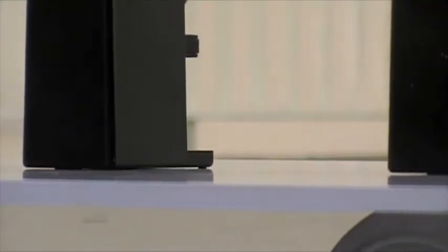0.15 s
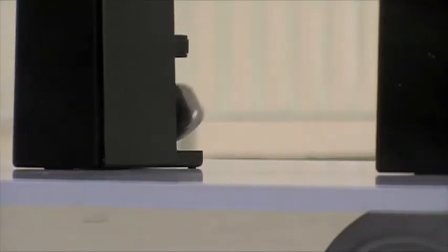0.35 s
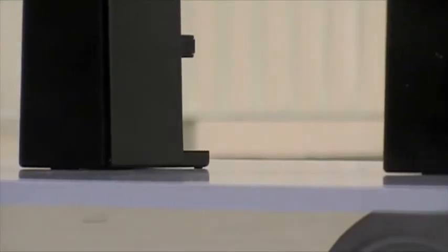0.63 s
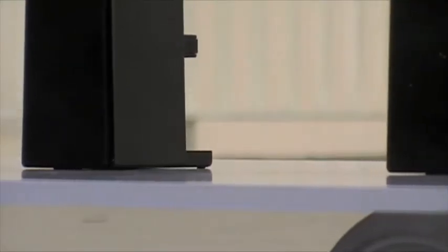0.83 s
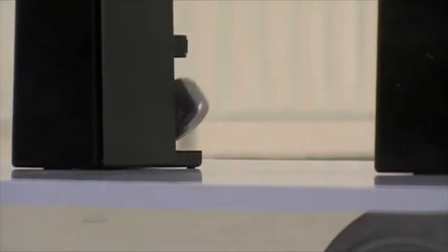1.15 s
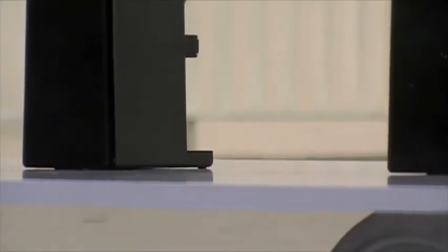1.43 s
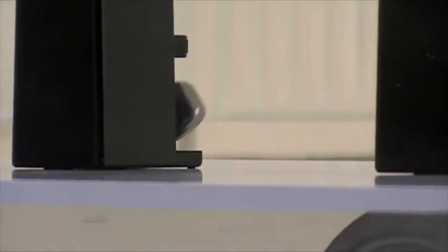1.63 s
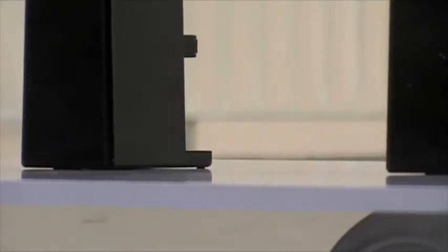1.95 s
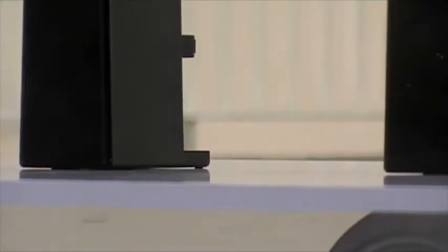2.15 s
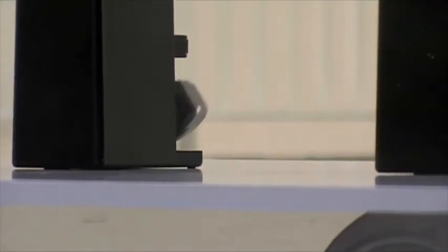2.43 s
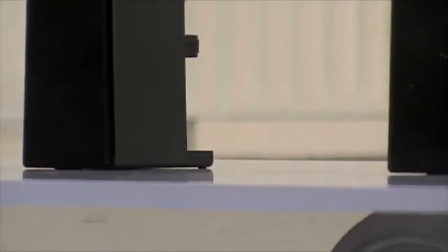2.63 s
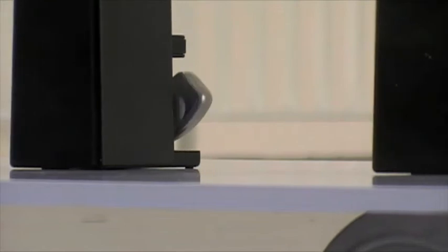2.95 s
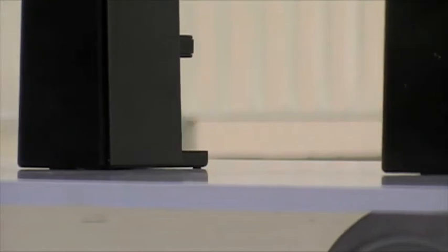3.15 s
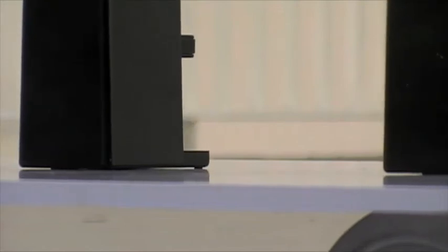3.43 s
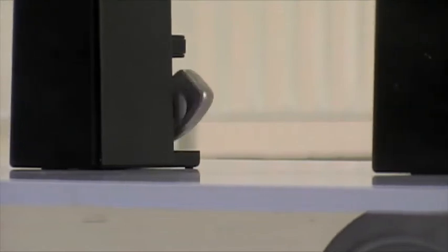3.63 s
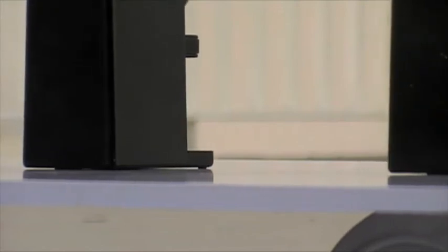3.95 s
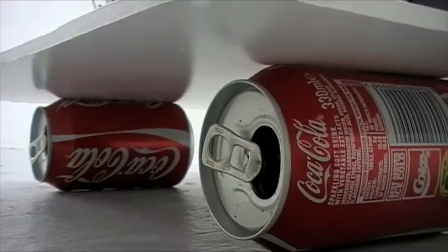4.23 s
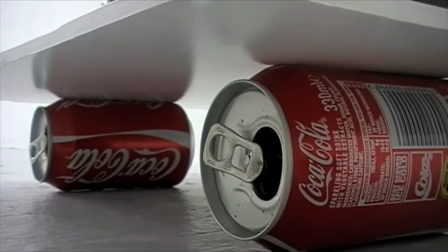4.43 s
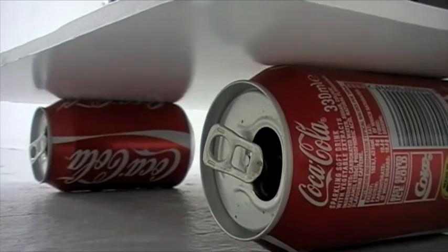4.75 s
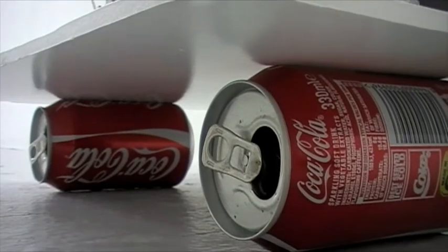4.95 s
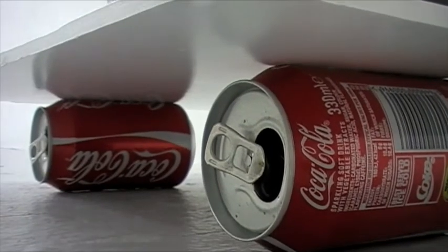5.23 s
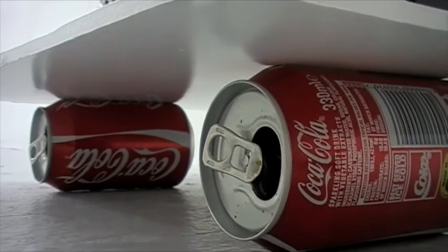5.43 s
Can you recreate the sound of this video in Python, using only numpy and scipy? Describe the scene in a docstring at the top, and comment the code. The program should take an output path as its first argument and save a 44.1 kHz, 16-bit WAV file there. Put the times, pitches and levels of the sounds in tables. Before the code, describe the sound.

From 0 to about 4 seconds, three small wind-up metronomes tick almost in unison, heard from close beside them in a live room. A strike group falls roughly every 0.32 seconds, each a tight flam of sharp, dry snaps with plastic clatter, short case ringing and a bright reverberant tail. Quiet room air and a low building hum lie beneath. Dull knocks and shuffles sound further off around 0.2 and 0.6 seconds, more faintly near 1.7 and 2.1, then again at 3.3 to 3.6. Faint high rustles appear around 1.9 and 2.5 to 2.7. Just before 4.04 seconds everything fades quickly to silence and returns at once from under the board. The same steady beat is now louder and more hollow, its clicks smeared into resonant bursts with very faint low thuds and weaker hum. A small soft knock comes near 5.3, and ticking continues to the end, around 5.6.

```python
"""Three wind-up metronomes tick almost in step on a light board resting on two empty cans, in a live room.
Each strike is a snap with clatter and ringing case modes, and every strike sets off a noise reverberation.
The microphone stands beside them at first; after a short fade it lies under the board, where the ticks are
louder and more hollow: smeared bursts and ringing board modes, with faint low thuds.
Soft knocks are bursts of low noise further off; shaped noise makes the rustles, the air and the rumble."""
import sys
import numpy as np
from scipy import signal
from scipy.fft import rfft, irfft, next_fast_len
from scipy.io import wavfile
from scipy.ndimage import uniform_filter1d, minimum_filter1d

SR = 44100
rng = np.random.default_rng(int(sys.argv[2]) if len(sys.argv) > 2 else 0)


def dump_mix(stems):
    """Bounce the given channels to the path in sys.argv[1] as a 16-bit WAV at rate SR."""
    frames = np.atleast_2d(stems).T  # one column per channel
    limited = np.clip(frames, -1, 1)  # hard clip at full scale
    pcm = np.round(limited * 32767).astype(np.int16)
    wavfile.write(sys.argv[1], SR, pcm)


N = 246519

TIME = np.arange(N) / SR
MOVE_S = 4.041    # the microphone changes place
SWING_S = 0.635   # one period of the pendulums: a tick and a tock

# Colour of each metronome heard from beside the board: [f/Hz, relative level/dB]
FIRST_COLOUR = [(100, -32), (400, -33), (820, 2), (1100, -7.5), (1500, -8), (2100, 1.5), (2800, -7.5),
                (3600, 7.5), (4500, -6), (6500, -6.5), (9000, -17.5), (12000, -30), (15500, -41)]
SECOND_COLOUR = [(100, -53), (400, -17), (820, -14.5), (1100, 4.5), (1500, -8.5), (2100, 3), (2800, -1.5),
                 (3600, -2.5), (4500, -5), (6500, -6), (9000, -19), (12000, -23.5), (15500, -49)]
THIRD_COLOUR = [(100, -21), (400, -14), (820, -23), (1100, 1), (1500, -8), (2100, 3), (2800, -5), (3600, 0),
                (4500, -5), (6500, -6.5), (9000, -25), (12000, -30), (15500, -65)]
# Colour from under the board, of the leading pair and of the third: [f/Hz, relative level/dB]
PAIR_UNDER = [(100, -34), (400, -23), (820, -24.5), (1130, -6.5), (1400, -18), (1720, -10), (2020, -2.5),
              (2300, -7.5), (3600, -9), (5000, -11), (7500, -14), (9500, -28), (12000, -35.5), (15500, -56)]
THIRD_UNDER = [(100, -44), (400, -13.5), (820, -21), (1100, -5.5), (1350, -15), (1850, -0.5), (2500, -2),
               (3100, -10), (4800, -2), (6000, -9.5), (8300, -17.5), (11000, -34), (15500, -54)]
# Board modes rung by the leading pair, right above the microphone:
# [f/Hz, typical level relative to the strike/dB, t60/s]
BOARD_MODES = [(380, -22, 0.22), (2003, 8, 0.022)]


def metronomes(first, second, third):
    """Three cases, each with its own colour, clatter and rebound; only the leading pair rings the board."""
    return (metronome(first, FIRST_COLOUR, PAIR_UNDER, BOARD_MODES,
                      clatter_db=-21, clatter_t60=0.06, rebound_s=0.0024)
            + metronome(second, SECOND_COLOUR, PAIR_UNDER, BOARD_MODES,
                        clatter_db=-16, clatter_t60=0.04, rebound_s=0.00117)
            + metronome(third, THIRD_COLOUR, THIRD_UNDER, [],
                        clatter_db=-19, clatter_t60=0.06, rebound_s=0.0027))


# Modes of the plastic cases: [f/Hz, typical level relative to the strike/dB, t60/s]
CASE_MODES = [(379.2, -22, 0.23), (1190, -22, .035), (2175, -5, 0.037), (2370, -28, 0.14),
              (3540, -49, 0.042), (3797, -5.5, 0.021), (4728, -6.5, 0.03), (6640, -9.5, 0.042),
              (7310, -30, 0.041)]


def metronome(strikes, beside, under, board_modes, clatter_db, clatter_t60, rebound_s, change=0.49):
    """Tick and tock each have their own grain, partly renewed at each strike, plus decaying sine modes."""
    t = np.arange(SR // 4) / SR
    grains = rng.standard_normal((2, 2, len(t)))   # (tick or tock, mid or side, time)
    out = np.zeros((2, N))
    for k, (s, level_db) in enumerate(strikes):
        fresh = rng.standard_normal((2, len(t)))
        grain = (grains[k % 2] + change * fresh) / np.hypot(1, change)
        if s < MOVE_S:   # the direct sound is narrower than the room
            mid, side = [tick_shape(t, beside, g, clatter_db, clatter_t60, rebound_s) for g in grain]
            side_db, modes = -7.5, CASE_MODES
        else:   # the board covers the cases and rings itself
            mid, side = [board_shape(t, under, g) for g in grain]
            side_db, modes = -4, board_modes
        for hz, mode_db, t60 in modes:
            strength = from_db(mode_db + 1.55 * rng.standard_normal())
            swell_and_decay = dying(t, t60) - dying(t, 0.003)   # swells in a fraction of a millisecond
            mid = mid + strength * np.sin(2 * np.pi * hz * t) * swell_and_decay
        side = from_db(side_db) * np.roll(side, SR // 1500)   # later, by way of nearby surfaces
        add(out, s, from_db(level_db) * np.array([mid, side]))
    low_cut_hz = 150   # the ticks carry no bass
    return signal.sosfilt(signal.butter(2, low_cut_hz, "high", fs=SR, output="sos"), out)


def tick_shape(t, spectrum, grain, clatter_db, clatter_t60, rebound_s,
               snap_db=-14, snap_t60=0.0052, rebound_db=-11):
    """A sharp snap, a small rebound of the pallet and dense clatter of the case; rms 1 over the first 4 ms."""
    snap = from_db(snap_db) * dying(t, snap_t60)
    clatter = from_db(clatter_db) * dying(t, clatter_t60)
    blow = grain * (snap + clatter)
    blow[0] = 1
    blow[round(rebound_s * SR)] += from_db(rebound_db)
    return first_4ms_one(colour(blow, spectrum))


def board_shape(t, spectrum, grain, swell_s=0.00067, burst_t60=0.016, clatter_db=-14, clatter_t60=0.056):
    """The board smears the snap into a burst that swells and dies; rms 1 over the first 4 ms."""
    flutter = np.tanh(2 * grain)   # many small, evenly strong reflections inside the board
    swell = 1 - np.exp(-t / swell_s)
    decay = dying(t, burst_t60) + from_db(clatter_db) * dying(t, clatter_t60)
    return first_4ms_one(colour(flutter * swell * decay, spectrum))


# Beat of each metronome, one row beside the board and one under it; every second strike (the tock) limps:
# [first tick t/s, beat/s, lateness of the tock/s, growth of that lateness/(s per beat)]
FIRST_BEAT = [(.0372, .31768, -.0007, -.00017), (4.184, .31655, -.0013, -.00025)]
SECOND_BEAT = [(.0427, .31768, .0011, 0), (4.1858, .31687, .004, -.0004)]
THIRD_BEAT = [(.0581, .31761, -.0011, .0007), (4.2071, .31657, .004, 0)]
# Strength of the snap or burst before its modes, one row beside the board and one under it:
# [tick level/dB, tock level/dB]
FIRST_DB = [(-19, -17.5), (-12, -12.4)]
SECOND_DB = [(-16.5, -17.5), (-19.5, -13)]
THIRD_DB = [(-20, -19), (-11.3, -9.5)]


def all_strikes():
    """Strike lists of the three escapements, each on a beat of its own."""
    return [escapement(beat, levels) for beat, levels in
            ((FIRST_BEAT, FIRST_DB), (SECOND_BEAT, SECOND_DB), (THIRD_BEAT, THIRD_DB))]


def escapement(beat, levels):
    """Strikes (t/s, level/dB): tick and tock alternate on an even beat, the tock a little early or late."""
    strikes = []
    ends = (MOVE_S, N / SR)
    for (start_s, beat_s, limp_s, limp_growth), tick_tock_db, end_s in zip(beat, levels, ends):
        for k, s in enumerate(np.arange(start_s, end_s, beat_s)):
            tock = k % 2
            strikes.append((s + tock * (limp_s + limp_growth * k), tick_tock_db[tock]))
    return strikes


def low_thuds(strikes, level_db=-50, hz=55, t60=0.048):
    """Under the board, a faint low decaying sine goes with each strike, at varying level."""
    t = np.arange(SR // 10) / SR
    out = np.zeros(N)
    for s, _ in strikes:
        if s > MOVE_S:
            strength = from_db(level_db + 3.5 * rng.standard_normal())
            add(out, s, strength * np.sin(2 * np.pi * hz * t) * dying(t, t60))
    return out


# Colour of the reverberation beside and under the board: [f/Hz, relative level/dB]
ROOM_BESIDE = [(100, -41.5), (250, -5), (400, -4.5), (850, -2), (1150, -0.5), (1550, -3), (2300, 4.5),
               (3000, -4), (3600, -3.5), (5400, -5.5), (7500, -9), (10000, -17.5), (13000, -39),
               (15500, -52)]
ROOM_UNDER = [(100, -36), (250, -24), (400, -18), (850, -16), (1150, -10), (1550, -7), (2300, 3.5),
              (3000, -8.5), (3600, -7.5), (5400, -10.5), (7500, -21.5), (10000, -27.5), (13000, -41),
              (15500, -75)]


def tick_tails(strikes, responses, beside_db=9.0, under_db=13.0, scatter=0.59, scatter_t60=0.046):
    """Every strike fills the room alike: a click and scattered noise of energy 1 drive the reverberation."""
    t = np.arange(SR // 40) / SR
    drive = np.zeros(N)
    for s, _ in strikes:
        blow = scatter * rng.standard_normal(len(t)) * dying(t, scatter_t60)
        blow[0] = 1
        add(drive, s, blow / np.sqrt(np.sum(blow ** 2)))
    placed = []
    for response in responses:
        tail = ringing_on(drive, response)
        beside = from_db(beside_db) * colour(tail, ROOM_BESIDE)
        under = from_db(under_db) * colour(tail, ROOM_UNDER)
        placed.append(np.where(TIME < MOVE_S, beside, under))
    return np.array(placed)


def ringing_on(drive, response):
    """Convolve with a long response; the pendulums were already swinging one period earlier."""
    lead = round(SWING_S * SR)
    return signal.fftconvolve(np.concatenate([drive[:lead], drive]), response)[lead:lead + N]


# Decay of the room: [f/Hz, t60/s]
ROOM_T60 = [(150, 0.99), (500, 1.28), (1400, 0.63), (2300, 1.05), (3300, 0.71), (6000, 0.76), (12000, 0.61)]


def room_response(build_s=0.0019):
    """Diffuse reverberation: half-octave bands of noise, each dying at its own rate; energy 1."""
    t = np.arange(3 * SR // 2) / SR
    white = rfft(rng.standard_normal(len(t)))
    freqs = np.arange(len(white)) * SR / len(t)
    band = np.round(2 * np.log2(np.maximum(freqs, 64)))   # half-octave number
    tail = np.zeros(len(t))
    for b in np.unique(band):
        tail += irfft(white * (band == b), len(t)) * dying(t, at_hz(ROOM_T60, 2 ** (b / 2)))
    tail = tail * (1 - np.exp(-t / build_s))
    return tail / np.sqrt(np.sum(tail ** 2))


# Dull knocks and shuffles in the room, before reverberation:
# [t/s, level before decay/dB, t60/s, lower edge f/Hz, upper edge f/Hz]
KNOCKS = [(.157, -25.5, 0.05, 220, 1300), (.166, -18.5, 0.12, 178, 725), (.199, -25, 0.14, 282, 1050),
          (.28, -35, 0.12, 334, 780), (.600, -28, 0.17, 157, 415), (.612, -36, 0.17, 415, 935),
          (1.725, -37.5, 0.46, 135, 720), (2.07, -49, 0.28, 70, 159), (3.335, -33.5, 0.46, 298, 1500),
          (3.375, -41.5, 0.22, 85, 420), (3.60, -34.5, 0.57, 350, 1450), (5.277, -33, 0.06, 149, 1310)]


def knocks(responses, wet_db=-5):
    """Soft blows on furniture: short low noise bursts with much of the room in them."""
    t = np.arange(SR // 2) / SR
    direct = np.zeros(N)
    for s, level_db, t60, low_hz, top_hz in KNOCKS:
        body = signal.butter(2, [low_hz, top_hz], "band", fs=SR, output="sos")
        once = signal.sosfilt(body, rng.standard_normal(len(t)))
        thud = rms_one(signal.sosfilt(body, once))   # filtered twice for steeper edges
        add(direct, s, from_db(level_db) * thud * dying(t, t60))
    mid, side = [from_db(wet_db) * signal.fftconvolve(direct, response)[:N] for response in responses]
    return np.array([direct + mid, side])


# Colour of the rustles: [f/Hz, relative density level/dB]
RUSTLE = [(1000, -26), (3000, 0), (8000, 5), (11000, -6.5), (15000, -26)]
# Faint high rustles: [start t/s, peak level of the noise gain/dB]
RUSTLES = [(1.86, -51.5), (2.52, -40), (2.71, -45)]


def rustling(attack_s=0.014, t60=0.68):
    """High noise that swells quickly and dies away slowly at each rustle."""
    gain, t = np.zeros(N), np.arange(SR) / SR
    for s, level_db in RUSTLES:
        add(gain, s, from_db(level_db) * np.minimum(t / attack_s, dying(t - attack_s, t60)))
    return hiss(RUSTLE, gain)


# Background of the room: [f/Hz, relative density level/dB]
AIR = [(18, -77), (30, -48), (81, -16.5), (176, -11), (240, -10.5), (511, -3), (1090, -2), (1520, -6),
       (2370, 0), (2770, -9.5), (4780, -11.5), (8470, -26.5), (15000, -55)]


def room_air():
    """Steady coloured noise of the room."""
    return hiss(AIR, by_place(beside_db=-41, under_db=-42))


# Low rumble and hum of the building: [f/Hz, relative density level/dB]
RUMBLE = [(25, -31), (50, -15), (76, -5.5), (86, -1.5), (95, 2.5), (112, -15), (170, -10), (212, -14.5),
          (243, 8), (275, -16.5), (600, -30), (3000, -72)]


def building_rumble():
    """Steady low noise with narrow humps for the hum, weaker under the board."""
    return hiss(RUMBLE, by_place(beside_db=-57.5, under_db=-69))


def hiss(spectrum, gain):
    """Coloured noise under a gain, as middle and side."""
    return gain * np.array([rms_one(colour(white, spectrum)) for white in rng.standard_normal((2, N))])


# Stereo width: [f/Hz, gain of the side signal/dB]
WIDTH = [(100, -15), (300, -15), (800, -12.5), (1700, -10), (3400, -9), (6000, -10.5), (8200, -3.5),
         (12000, 1.5)]


def stereo(mid, side):
    """Left and right from a middle signal and a side signal."""
    return mid + colour(side, WIDTH) * np.array([[1], [-1]])


def by_place(beside_db, under_db):
    """Gain at every sample: one level beside the board, another under it."""
    return from_db(np.where(TIME < MOVE_S, beside_db, under_db))


def fade(out_s=0.088, in_s=0.074):
    """A straight fade to silence at the change of place, and back up."""
    return np.minimum(np.maximum((MOVE_S - TIME) / out_s, (TIME - MOVE_S) / in_s), 1)


def colour(x, spectrum):
    """Causal (minimum-phase) filter with the given response [f/Hz, level/dB]."""
    size = 2 * next_fast_len(len(x))
    freqs = np.arange(size // 2 + 1) * SR / size
    cepstrum = irfft(np.log(from_db(at_hz(spectrum, freqs))))
    cepstrum[1:size // 2] *= 2   # fold onto positive times to make it causal
    cepstrum[size // 2 + 1:] = 0
    return irfft(rfft(x, size) * np.exp(rfft(cepstrum)))[:len(x)]


def at_hz(points, hz):
    """Read a table on a log-frequency axis."""
    freqs, values = np.transpose(points)
    return np.interp(np.log(np.maximum(hz, 1)), np.log(freqs), values)


def dying(t, t60):
    """Exponential decay by 60 dB in t60 seconds."""
    return np.exp(-np.log(1000) * t / t60)


def from_db(db):
    """Decibels to gain."""
    return 10 ** (np.asarray(db) / 20)


def rms_one(x):
    """Scale to rms 1."""
    return x / np.sqrt(np.mean(x ** 2) + 1e-20)


def first_4ms_one(x):
    """Scale to rms 1 over the first 4 ms."""
    return x / np.sqrt(np.mean(x[:SR // 250] ** 2))


def add(track, s, sound):
    """Mix a sound into a track at time s."""
    at = max(round(s * SR), 0)
    track[..., at:at + sound.shape[-1]] += sound[..., :N - at]


def scene():
    """Metronomes, room and background, a little to the left."""
    responses = [room_response(), room_response()]   # middle and side
    first, second, third = all_strikes()
    ticks = metronomes(first, second, third)
    background = room_air() + rustling() + building_rumble()
    mid, side = ticks + tick_tails(first + second + third, responses) + knocks(responses) + background
    pan = by_place(beside_db=0.44, under_db=0.12)   # left raised, right lowered by as much
    return stereo(mid + low_thuds(first), side) * np.array([pan, 1 / pan])


def record(dry):
    """A bass cut, a fast limiter on the loudest peaks, the fade at the change of place, the top cut."""
    bass_cut_hz, top_cut_hz = 32, 16700
    x = signal.sosfilt(signal.butter(2, bass_cut_hz, "high", fs=SR, output="sos"), dry)
    ceiling = 0.98   # peak allowed ahead of the fade and the top cut
    allowed = ceiling / np.maximum(np.abs(x).max(axis=0), ceiling)
    limiter = uniform_filter1d(minimum_filter1d(allowed, size=33), size=33)
    top_cut = signal.cheby2(14, 70, top_cut_hz, fs=SR, output="sos")
    return signal.sosfilt(top_cut, x * limiter * fade())


dry = scene()
out = record(dry)
dump_mix(out)
```